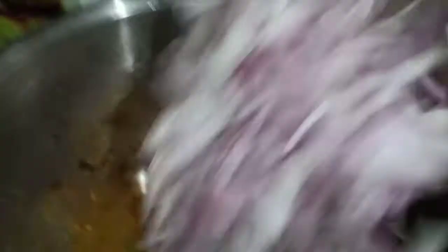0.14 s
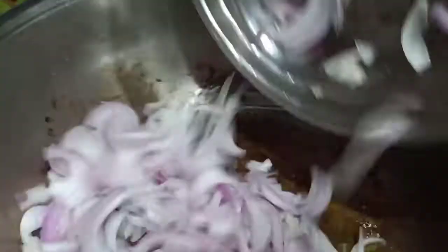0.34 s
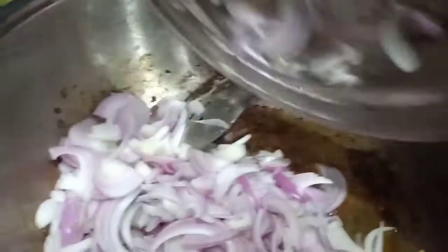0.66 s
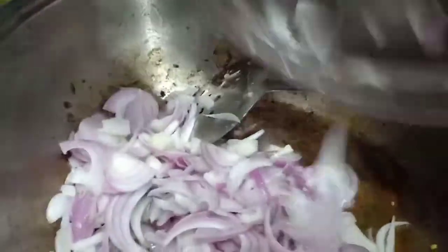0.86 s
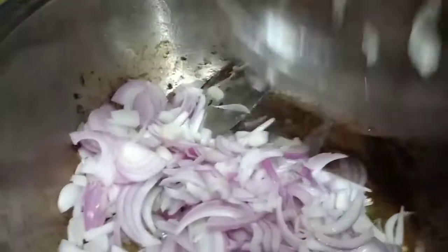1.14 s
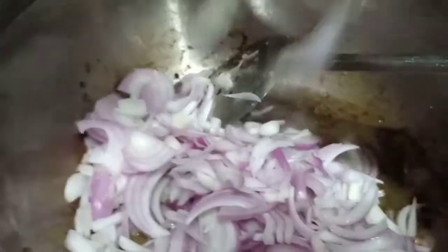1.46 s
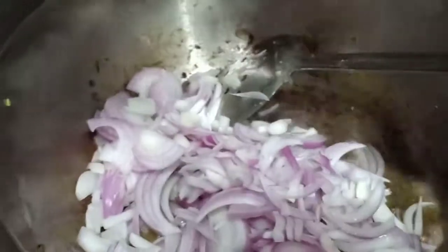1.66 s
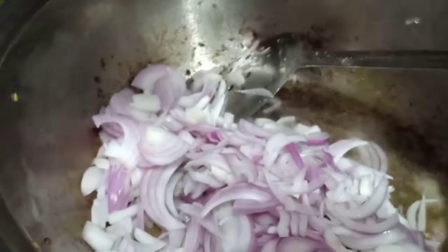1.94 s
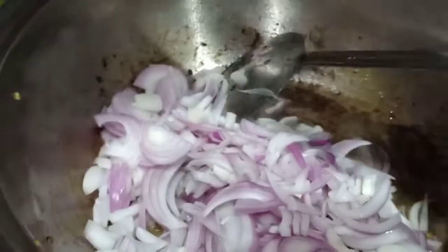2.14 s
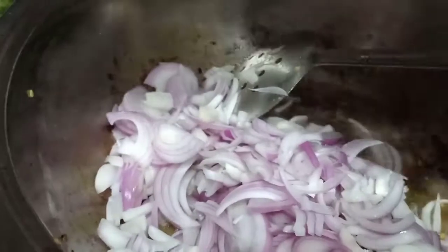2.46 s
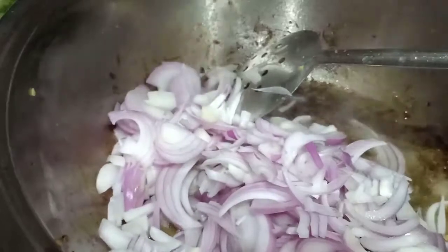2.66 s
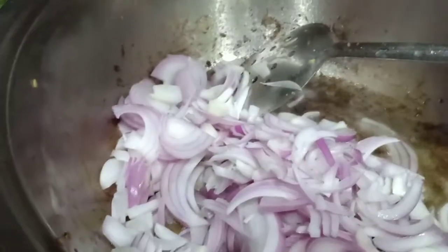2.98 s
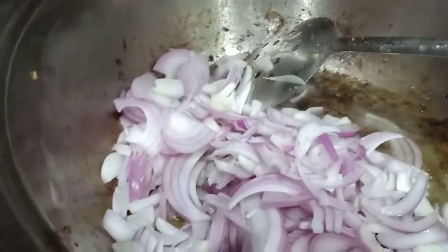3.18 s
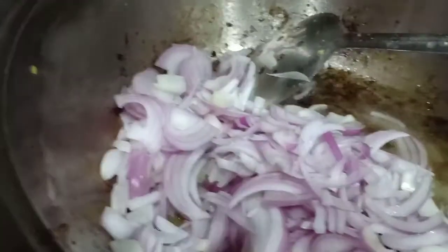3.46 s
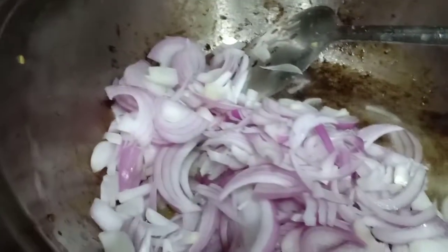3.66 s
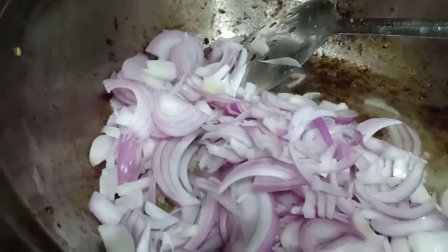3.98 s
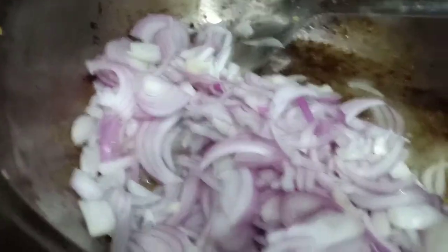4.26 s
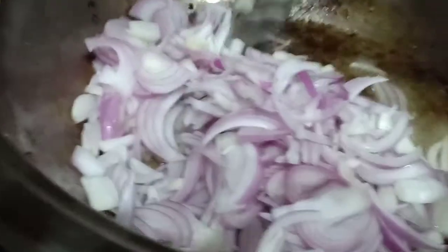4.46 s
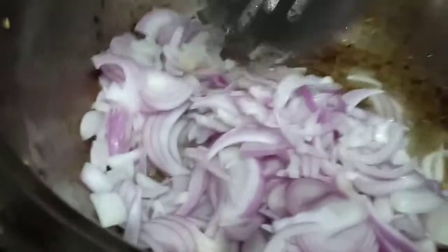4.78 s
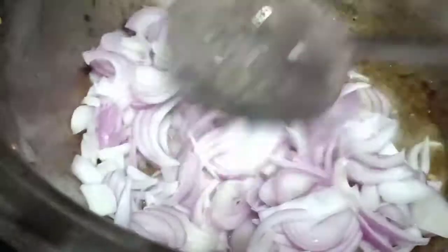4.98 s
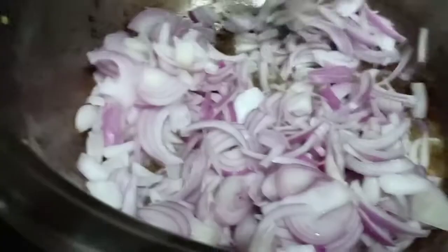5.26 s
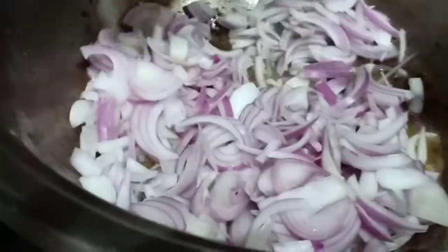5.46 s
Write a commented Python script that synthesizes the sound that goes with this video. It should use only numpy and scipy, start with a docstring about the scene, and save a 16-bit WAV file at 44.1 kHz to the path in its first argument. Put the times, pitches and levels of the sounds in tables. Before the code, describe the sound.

A brief metallic scrape and clank, a thud of onions landing, then a rushing, crackling fry with one ladle clank midway.

```python
"""In a kitchen, over a wide pan of hot oil: a phone held close, with two microphone ports, as sliced onions slide in.
A steel bowl rubs, sings and clanks as damped modes; the slices thud and patter on the pan, and steam rushes out.
Water boils off in bubbles of four sizes, each a band of noise puffs over smooth hiss, flaring with ladle stirs.
Single spits and plops are short damped rings; a ladle clanks and scrapes. Underneath are dull bumps, quiet room
noise and faint low noise in narrow bands, broken up at random by flicker and gaps."""
import sys
import numpy as np
from scipy import signal
from scipy.fft import rfft, irfft, next_fast_len
from scipy.io import wavfile
from scipy.ndimage import uniform_filter1d

SR = 44100
rng = np.random.default_rng(int(sys.argv[2]) if len(sys.argv) > 2 else 0)


def master(y):
    """Save y as 16-bit WAV."""
    cut = np.clip(np.atleast_2d(y).T, -1, 1)
    pcm = np.round(cut * 32767)  # scale
    wavfile.write(sys.argv[1], SR, pcm.astype(np.int16))


N = 248046

# Quiet sounds under the frying.
# Colour of the room noise. Each row: frequency in Hz, level in dB per Hz.
KITCHEN_COLOUR = [(59, -31), (100, -25), (367, -1), (502, -34), (2090, 4), (2420, -25), (3390, -0.5),
                  (15000, -37)]
KITCHEN_DB = -50
# Top level of a faint low hum, broken up by flicker and gaps. Each row: time in seconds, level in dB.
HUM_TOP = [(0, -54), (1.85, -55), (1.95, -66), (2.3, -58), (2.8, -72), (3.3, -57), (3.6, -54), (5.2, -53),
           (5.35, -70), (5.6, -85)]
HUM_HZ, HUM_HALF_WIDTH_HZ = 102, 14
HUM_FLICKER_DB, HUM_FLICKER_RATE = 16, 26  # dB either side of the middle, new levels per s
# Narrow low noise switched on and off at random. Each row: frequency in Hz, level re the hum's top in dB.
GAPPED_BANDS = [(225, -9), (320, -4.5)]
GAP_DB, GAP_RATE = 40, 20  # depth of the gaps, new levels per s
# Dull bumps against the pan. Each row: centre in seconds, level in dB, time to fall to 1/e in ms.
BUMPS = [(3.470, -40, 25), (3.66, -48, 60), (.3, -57, 150), (5.255, -46, 6), (5.37, -46, 12),
         (5.475, -46, 18)]
BUMP_HZ = 300

# The steel bowl.
# Modes of the bowl wall. Each row: frequency in Hz, gain in dB, decay by 60 dB in seconds.
BOWL = [(2227, 13, 0.016), (2776, 0, 0.048), (2780, -14, .03), (890, 14, 0.018), (580, -28, .04),
        (1470, -7, 0.066), (5130, 3, 0.009), (3700, -15, 0.009)]
# Slices sliding down the bowl. Each row: time in seconds, level in dB.
SLIDE = [(0, -49), (.036, -58), (.044, -28.5), (.07, -39.5), (.105, -35.5), (.128, -42), (.15, -37.5),
         (.19, -37.5), (.205, -37.5), (.3, -45)]
SLIDE_OTHER_DB = -6  # modes after the first three, re those three
# Slices skidding on the wall. Each row: start in seconds, length in ms, level of the lower ring in dB,
# upper ring re the lower in dB.
SKIDS = [(.066, 10, -35, -8), (.077, 24, -39, 4), (.1035, 22, -23, -14), (.133, 12, -27, -6),
         (.142, 12, -34, 4), (.151, 20, -24, -7), (.172, 20, -33, 5)]
# Two bands of rough rustle under each skid. Each row: low edge in Hz, high edge in Hz.
RUSTLE_BANDS = ((2000, 3100), (4700, 6000))
RUSTLE_DB, RUSTLE_TOP_DB = -9, -4  # re the skid's ring, upper band re lower band
# Knocks on the bowl. Each row: start in seconds, peak in dB, left minus right in dB.
KNOCKS = [(.0302, -30, -8), (0.0403, -11, -8.5)]

# The boil.
# How hard the pan boils. Each row: time in seconds, fizz level in dB, lean toward bigger bubbles in dB.
BOIL = [(.09, -56, -6), (.16, -44.5, -8), (.207, -47, -6), (.213, -39, 8), (.232, -35, 11), (.243, -31, 7),
        (.27, -28.5, 3), (.33, -23.5, 0), (.49, -21, -1.5), (.53, -27, 4.5), (.7, -21, 1), (.85, -24, 3),
        (1.25, -24.5, 2), (1.7, -22, 1.5), (1.8, -25.5, 0.5), (1.95, -25, 0), (2.3, -24.5, 0.5),
        (2.9, -21, 1.5), (3.5, -21.5, 1.5), (3.85, -24.5, 1), (4.5, -25, 0), (4.8, -23.5, -0.5),
        (5.12, -25, 0.5), (5.45, -22.5, -2), (5.62, -24.5, -1.5)]
# Colour of a bursting bubble through pan and microphone. Each row: frequency in Hz, level in dB per Hz.
SIZZLE = [(190, -59), (330, -42), (401, -33.5), (464, -26), (503, -15.5), (582, -20.5), (1350, -13),
          (1960, -2.5), (2660, 0.5), (3450, -10), (5010, 2), (7630, -14), (9720, -20.5), (13900, -15),
          (15800, -21.5)]
# Bubble sizes. Each row: low edge in Hz, high edge in Hz, bursts per s, size scatter in dB, burst length in ms,
# share of smooth hiss, flicker in dB.
BUBBLES = [(3460, 6590, 900, 9, 2.3, 0.77, .5), (1280, 3700, 460, 2.5, 3.7, 0.57, 0.5),
           (377, 1088, 600, 2.5, 1.6, 0.54, 1.5), (7010, 19800, 3800, 7, 2.2, 0.81, 0.85)]
# One entry per bubble size: level re the fizz in dB.
SIZE_DB = (0, -5.5, -20, -8)
# One entry per bubble size: how far it follows the lean, as a factor.
SIZE_LEAN = (0, 1, 1, 0.00076)
# One entry per bubble size: likeness of left and right, 0 to 1.
ALIKE = (.2, .2, .62, .05)
# One entry per bubble size: power of the shared snaps, re the size's own power.
SNAP_SHARE = (0.085, 0.14, 0.1, 0.011)
SNAP_RATE, SNAP_SCATTER_DB, SNAP_MS = 55, 0, 0.75  # snaps per s that sound in every size at once
SURGE_DB, SURGE_RATE = .6, 18  # the whole pan surges together, new levels per s
# The ladle turns wet slices into the oil and the boil flares. Each row: start in seconds, hold in seconds,
# rise in dB.
STIRS = [(5.131, 0.071, 5), (5.276, 0.01, 1.5), (5.44, 0.043, 1.5)]
STIR_ATTACK_S, STIR_T60_S = 0.032, 0.08  # the t60 is that of the dB rise itself
# Difference between the two ports. Each row: frequency in Hz, left minus right in dB.
PORTS = [(60, 1.0), (110, 3), (200, -7), (380, -6), (700, -3), (1290, -5.5), (2380, -7.5), (4400, -4),
         (8120, -2.5), (15000, 1.5)]
# The phone drifts over the pan. Each row: time in seconds, left minus right of the fizz in dB (used re its mean),
# left minus right of the spits in dB, left lag in samples.
DRIFT = [(0.3, -4.5, -8, 2), (1.3, -5, -8.5, 2), (1.7, -4, -5.5, 2), (2.2, -3, -4.5, -6),
         (2.6, -2.5, -3.5, -7), (3.7, -2.5, -3.5, -7), (4.3, -3, -5, -6), (4.9, -3.5, -6, -5),
         (5.15, -4.5, -8, 1), (5.6, -4.5, -8, 1)]

# The slices on the pan.
# Modes of the pan. Each row: frequency in Hz, gain in dB, decay by 60 dB in seconds.
PAN = [(392, -20, 0.25), (520, -16, 0.2), (692, -11, 0.35), (785, -7, 0.13), (815, -4, 0.13),
       (975, -9, .07), (1440, -3, 0.05), (1680, -3, .04), (2300, 13, 0.012), (4030, -2, .015),
       (4900, 9, 0.014), (5780, 5, .015)]
# Thuds on the pan. Each row: start in seconds, peak in dB, left minus right in dB.
THUDS = [(.2118, -22, -6), (0.2358, -6, -6.5), (.2383, -8, -6.5), (.2478, -21, -6.5), (.2595, -17, -6.5),
         (.2668, -22, -6.5)]
# slices keep landing and ring the pan
PATTER_S, PATTER_DB, PATTER_ATTACK_S, PATTER_T60_S = 0.203, -32, 0.025, 0.75
# the first rush of steam has a narrow bright hiss that rises in pitch, then sags
RUSH_S, RUSH_DB, RUSH_ATTACK_S, RUSH_HOLD_S, RUSH_T60_S = .285, -29.5, 0.03, 0.28, 0.3
RUSH_START_HZ, RUSH_TOP_HZ, RUSH_RISE_S, RUSH_SAG_HZ_PER_S = 2350, 2600, .06, 600
RUSH_WIDTH_HZ = 450

# Single bubbles.
# Spits. Each row: time in seconds, peak in dB, ring in Hz, thump re peak in dB.
SPITS = [(0.3504, -14, 4880, -16), (0.4514, -15, 2470, -25), (0.4694, -11, 2460, -28),
         (0.482, -18, 2320, -29), (0.4884, -14, 2500, -30), (0.5152, -10.5, 2820, -39),
         (0.6439, -12, 2600, -31), (0.653, -11, 2680, -29), (0.6634, -16, 5200, -25),
         (0.7118, -12, 5330, -27), (0.7318, -9.5, 1980, -20), (0.7474, -7.5, 5340, -25),
         (0.7654, -13, 2160, -16), (0.777, -8, 5270, -24), (0.91, -9, 5370, -23), (1.3029, -15, 5450, -12),
         (1.5848, -12.5, 2670, -17), (1.7095, -12.5, 2580, -31), (2.117, -12, 5180, -32),
         (2.6194, -14, 4760, -28), (2.7074, -23, 5280, -22), (2.7944, -29, 5340, -28),
         (2.8416, -8, 5200, -39), (2.8684, -19, 4910, -29), (2.9064, -18, 4750, -9),
         (2.9374, -17, 4740, -9), (2.9655, -5.5, 5100, -17), (2.9854, -14, 4840, -16),
         (3.0204, -11, 5330, -18), (3.1852, -21, 5000, -31), (3.6172, -20, 4600, -26),
         (3.6618, -9, 4900, -30), (3.7379, -20, 4900, -27), (3.8154, -16, 2700, -22),
         (3.8364, -19, 5170, -21), (3.8654, -8, 2500, -25), (3.936, -11, 4300, -32),
         (4.1054, -20, 5270, -24), (4.2876, -6.5, 5000, -27), (4.3395, -11, 5190, -36),
         (4.4094, -19, 2280, -31), (4.9194, -18, 5120, -24), (5.1978, -13, 5270, -30),
         (5.217, -12, 5140, -30), (5.2246, -11, 5070, -35), (5.2304, -19, 4570, -25),
         (5.2364, -10, 4900, -28), (5.255, -5, 5070, -33), (5.2657, -12, 5000, -23),
         (5.2889, -16, 4170, -18), (5.2918, -9, 5000, -32), (5.3004, -15, 5100, -13.5),
         (5.3644, -8.5, 5140, -20), (5.38, -11, 4850, -16.5), (5.4364, -20, 5200, -12),
         (5.457, -13, 5360, -22), (5.4684, -14, 5350, -17), (5.4823, -7.5, 4970, -22),
         (5.5047, -16, 5050, -22), (5.5483, -11, 5130, -32), (0.589, -18, 1580, -27),
         (1.495, -24, 920, -20), (3.11, -24.5, 1040, -20), (3.6618, -7, 2340, -27)]
SPIT_DELAY_S = .0006  # each spit starts this long after its listed time
THUMP_HZ = 895  # low thump under each spit
CRACK_RATIO, CRACK_DB = 2.1, -27  # each spit also cracks in the other broad resonance of the sizzle
# quieter plops at random: per s, middle pitch, log spread of pitch, middle peak and its scatter
PLOP_RATE, PLOP_HZ, PLOP_SPREAD, PLOP_DB, PLOP_SCATTER_DB = 3, 1100, .25, -30, 2.5
LOW_PAN_DB = -6  # left minus right of plops and thumps
# decay and rise at 1 kHz; both shorten as powers of the pitch
RING_MS, RISE_MS, RING_SLOPE, RISE_SLOPE = 1.2, .5, .5, .9

# The ladle.
# Modes of the ladle. Each row: frequency in Hz, gain in dB, decay by 60 dB in seconds.
LADLE = [(1975, 0, .05), (1350, -17, .06), (1600, -12, .08), (1870, -10, .09), (2250, -10, .07),
         (2580, -4, .08), (3580, -11, .04)]
# Clanks of the ladle. Each row: start in seconds, peak in dB, left minus right in dB.
CLANKS = [(3.5105, -7, -5), (3.51355, -6.5, -5), (3.5232, -12, -5), (3.541, -18, -5), (3.559, -16, -5),
          (3.576, -21, -5)]
# after the first clanks the ladle slips along the pan wall
SCRAPE_S, SCRAPE_DB, SCRAPE_ATTACK_S, SCRAPE_HOLD_S, SCRAPE_T60_S = 3.52, -30.5, 0.0061, .05, .8

# The phone.
NOTCH_HZ, NOTCH_WIDTH_HZ = 9790, 350  # narrow dip of the microphone port
SQUASH = .6  # how hard the peaks are rounded
TOP_HZ = 15600


def undb(db):
    """Gain of a dB value."""
    return 10 ** (np.asarray(db) / 20)


def unit(x):
    """Scale to rms 1."""
    return x / np.sqrt(np.mean(x ** 2))


def shape(x, table):
    """Colour by (Hz, dB) points joined on a log axis."""
    size = next_fast_len(N)
    points_hz, points_db = np.array(table).T
    log_hz = np.log(np.maximum(np.arange(size // 2 + 1) * SR / size, 1))
    gain = undb(np.interp(log_hz, np.log(points_hz), points_db))
    return irfft(rfft(x, size) * gain, size)[..., :N]


def band(x, low_hz, high_hz, order=2):
    """Butterworth band-pass."""
    edges = [low_hz, min(high_hz, .45 * SR)]
    return signal.sosfilt(signal.butter(order, edges, "bandpass", fs=SR, output="sos"), x)


def walk(rate):
    """Random levels held 1 / rate s and slewed, without slow drift; spread 1."""
    hold = int(SR / rate)
    steps = np.repeat(rng.standard_normal(N // hold + 1), hold)[:N]
    slewed = uniform_filter1d(steps, hold)
    return unit(slewed - uniform_filter1d(slewed, 4 * hold))


def curve(table):
    """Columns of a table at every sample."""
    s, *columns = np.transpose(table)
    return [np.interp(np.arange(N) / SR, s, column) for column in columns]


def swell(s, attack_s, hold_s, t60_s):
    """Gain that rises, holds at 1 and dies away."""
    t = np.arange(N) / SR - s
    return np.clip(t / attack_s, 0, 1) * undb(-60 * np.maximum(t - attack_s - hold_s, 0) / t60_s)


def fade(x, ms):
    """One-pole tail."""
    return signal.lfilter([1], [1, -np.exp(-1000 / (ms * SR))], x)


def bursts(rate, scatter_db, ms):
    """Power of random bursts with a few large ones; mean 1."""
    size = np.minimum(rng.exponential(size=N), 4)
    starts = rng.random(N) < rate / SR
    power = fade(starts * undb(2 * scatter_db * size), ms)  # doubled: dB of power
    return power / power.mean()


def ring(push, modes):
    """Damped modes driven by a force."""
    out = 0
    for hz, db, t60 in modes:
        pole = np.exp(2j * np.pi * hz / SR - np.log(1000) / (t60 * SR))
        out = out + undb(db) * signal.lfilter([1], [1, -pole], push).imag
    return out


def sides(x, pan_db):
    """Place between the two ports."""
    return x * undb(np.multiply.outer([.5, -.5], pan_db * np.ones(N)))


def pair(alike, size=N):
    """Two noises with the given likeness."""
    shared, left, right = rng.standard_normal((3, size))
    return np.sqrt(alike) * shared + np.sqrt(1 - alike) * np.array([left, right])


def blow(hit, modes, push_ms, tick, crack_db, rise_ms=1.0):
    """A tick and a short rough push ring the metal under a broad crack; each port hears another mix."""
    s, db, pan_db = hit
    out, size, i = np.zeros((2, N + SR)), SR // 2, int(s * SR)
    ms = np.arange(size) * 1000 / SR
    rough = (1 - np.exp(-ms / rise_ms)) * np.exp(-ms / push_ms) * pair(0.55, size=size)
    push = tick * (ms == 0) + rough
    # cut the low skirt of the ring filters below the lowest mode
    lowest = min(hz for hz, *_ in modes)
    metal = band(ring(push, modes), .97 * lowest, 12000, order=4)
    crack = undb(crack_db) * band(push, lowest, 6500, order=4)
    sound = metal + crack
    out[:, i:i + size] = sound / np.abs(sound).max(axis=1, keepdims=True)
    return sides(out[:, :N] * undb(db), pan_db)


def broken_low_noise():
    """Faint low hum and two bands above it: narrow noise broken up at random by flicker and gaps."""
    top_db = curve(HUM_TOP)[0]
    flicker_db = HUM_FLICKER_DB * (np.tanh(2 * walk(HUM_FLICKER_RATE)) - 1)
    hum = unit(band(pair(0.57), HUM_HZ - HUM_HALF_WIDTH_HZ, HUM_HZ + HUM_HALF_WIDTH_HZ))
    out = hum * undb(top_db + flicker_db)
    for hz, db in GAPPED_BANDS:
        gap_db = GAP_DB * (np.tanh(2 * walk(GAP_RATE) - 1) - 1) / 2
        noise = unit(band(pair(.6), hz / 1.12, hz * 1.12, order=3))
        out = out + noise * undb(top_db + db + gap_db)
    return out


def kitchen():
    """Quiet room noise, and bumps against the pan as swells of low noise."""
    t = np.arange(N) / SR
    shake = sum(undb(db) * np.exp(-((t - s) * 1000 / ms) ** 2) for s, db, ms in BUMPS)
    bumps = unit(band(pair(0.97), BUMP_HZ / 3, BUMP_HZ * 1.4)) * shake
    room = unit(band(shape(pair(0.13), KITCHEN_COLOUR), 433, 16000, order=8)) * undb(KITCHEN_DB)
    return bumps + room


def skids():
    """Each skid makes two modes of the bowl wall sing briefly, stuttering, over a rough rustle."""
    t, sing, rustle = np.arange(N) / SR, 0, 0
    low_stutter, upper_stutter = undb(2.0 * walk(250)), undb(2.6 * walk(400))
    for s, ms, db, upper_db in SKIDS:
        part = np.clip((t - s) * 1000 / ms, 0, 1)
        detune = 1 + 0.013 * rng.standard_normal(2)
        low = np.sin(2 * np.pi * BOWL[0][0] * detune[0] * (t - s)) * low_stutter
        upper = np.sin(2 * np.pi * BOWL[1][0] * detune[1] * (t - s)) * upper_stutter
        sing = sing + undb(db) * np.sin(np.pi * part ** 0.9) ** 2.1 * (low + undb(upper_db) * upper)
        rustle = rustle + undb(db + max(upper_db, -8) + RUSTLE_DB) * np.sin(np.pi * part) ** 2
    low_band = unit(band(pair(.4), *RUSTLE_BANDS[0]))
    top_band = unit(band(pair(.3), *RUSTLE_BANDS[1]))
    return sing + rustle * (low_band + undb(RUSTLE_TOP_DB) * top_band)


def bowl():
    """Knocks ring the bowl's modes; slices rub them with noise and skid as they slide out."""
    t = np.arange(N) / SR
    moving = np.clip((SLIDE[-1][0] - t) / 0.064, 0, 1) * undb(1.7 * walk(89.4))
    rub = unit(ring(pair(0.2), BOWL[:3])) + undb(SLIDE_OTHER_DB) * unit(ring(pair(0.65), BOWL[3:]))
    slide = rub * undb(curve(SLIDE)[0]) * moving
    knocks = sum(blow(hit, BOWL, 1.5, 4.8, 4.3) for hit in KNOCKS)
    return sides(slide, -3.1) + sides(skids(), -5) + knocks


def frying():
    """Each size of bubble bursts at random as short puffs of noise over a hiss of finer ones."""
    fizz_db, lean_db = curve(BOIL)
    for s, hold, rise_db in STIRS:
        fizz_db = fizz_db + rise_db * swell(s, STIR_ATTACK_S, hold, STIR_T60_S)
    surge_db, out = SURGE_DB * walk(SURGE_RATE), 0
    snaps = bursts(SNAP_RATE, SNAP_SCATTER_DB, SNAP_MS)
    for size, alike, share, db, lean in zip(BUBBLES, ALIKE, SNAP_SHARE, SIZE_DB, SIZE_LEAN):
        low, high, rate, scatter_db, ms, hiss, flicker_db = size
        power = hiss + (1 - hiss) * bursts(rate, scatter_db, ms) + share * snaps
        puffs = pair(alike) * np.sqrt(power)
        level_db = fizz_db + db + lean * lean_db + surge_db + flicker_db * walk(32)
        out = out + unit(band(shape(puffs, SIZZLE), low, high, order=4)) * undb(level_db)
    # each port faces the pan differently, so left and right differ in colour
    ports = np.array(PORTS)
    out = np.array([shape(out[0], ports * [1, .5]), shape(out[1], ports * [1, -.5])])
    onset = np.clip((np.arange(N) / SR - BOIL[0][0]) / 0.0021, 0, 1)
    pan_db = curve(DRIFT)[0]
    return sides(out * onset, pan_db - pan_db.mean())


def steam_rush():
    """Slow noise on a gliding carrier is a narrow band of hiss that moves."""
    t = np.arange(N) / SR - RUSH_S
    rise_hz = np.interp(t, [0, RUSH_RISE_S], [RUSH_START_HZ, RUSH_TOP_HZ])
    hz = rise_hz - RUSH_SAG_HZ_PER_S * np.clip(t - RUSH_RISE_S, 0, 1)
    lowpass = signal.butter(2, RUSH_WIDTH_HZ / 2, fs=SR, output="sos")
    slow = signal.sosfilt(lowpass, pair(0.25) + 1j * pair(0.17))
    hiss = unit((slow * np.exp(2j * np.pi * np.cumsum(hz) / SR)).real)
    return hiss * undb(RUSH_DB) * swell(RUSH_S, RUSH_ATTACK_S, RUSH_HOLD_S, RUSH_T60_S)


def landing():
    """The heap hits the pan, stragglers patter after it on three of its modes and steam rushes out."""
    patter = unit(ring(pair(0.49) * np.sqrt(bursts(150, 3.9, 5.3)), PAN[:3]))
    patter = patter * undb(PATTER_DB) * swell(PATTER_S, PATTER_ATTACK_S, 0, PATTER_T60_S)
    thuds = sum(blow(hit, PAN, 1.3, 6, 17, rise_ms=.2) for hit in THUDS)
    return thuds + sides(patter, -2.5) + sides(steam_rush(), -13)


def add_bubble(out, s, hz, db, pan_db):
    """One bursting bubble: a damped ring, quicker the smaller it is."""
    rise_ms, ring_ms = RISE_MS * (hz / 1000) ** -RISE_SLOPE, RING_MS * (hz / 1000) ** -RING_SLOPE
    ms = np.arange(1024) * 1000 / SR
    burst = np.sin(2 * np.pi * hz * ms / 1000) * (1 - np.exp(-ms / rise_ms)) * np.exp(-ms / ring_ms)
    burst = burst / np.abs(burst).max() * undb(db)
    i = int(s * SR)
    out[0, i:i + 1024] += burst * undb(pan_db / 2)
    out[1, i:i + 1024] += burst * undb(-pan_db / 2)


def spits():
    """Drops of water flashing to steam crack with a small thump; big bubbles plop."""
    out = np.zeros((2, N + 2048))
    span_s = N / SR - RUSH_S  # no plops before the rush of steam
    for _ in range(int(PLOP_RATE * span_s)):
        s = RUSH_S + rng.random() * span_s
        db = PLOP_DB + PLOP_SCATTER_DB * rng.standard_normal()
        hz = PLOP_HZ * np.exp(PLOP_SPREAD * rng.standard_normal())
        add_bubble(out, s, hz, db, LOW_PAN_DB)
    pan_db = curve(DRIFT)[1]
    for s, db, hz, thump_db in SPITS:
        pan, s = pan_db[int(s * SR)], s + SPIT_DELAY_S
        crack_hz = hz / CRACK_RATIO if hz > BUBBLES[0][0] else hz * CRACK_RATIO
        add_bubble(out, s, hz, db, pan)
        add_bubble(out, s, crack_hz, db + CRACK_DB, pan)
        add_bubble(out, s, THUMP_HZ, db + thump_db, LOW_PAN_DB)
    return band(out[:, :N], 420, 16000, order=4)


def ladle():
    """Clanks ring the ladle's modes; dense stick-slip clicks keep them ringing as it settles."""
    clanks = sum(blow(hit, LADLE, 3., 30, 2) for hit in CLANKS)
    drag = unit(ring(pair(.6) * np.sqrt(bursts(200, 4, 1.5)), LADLE))
    scrape = drag * undb(SCRAPE_DB) * swell(SCRAPE_S, SCRAPE_ATTACK_S, SCRAPE_HOLD_S, SCRAPE_T60_S)
    return clanks + sides(scrape, CLANKS[0][2])


def scene():
    """All layers summed; the left port hears them a little before or after the right."""
    out = broken_low_noise() + kitchen() + bowl() + frying() + landing() + spits() + ladle()
    lag = np.round(curve(DRIFT)[2]).astype(int)
    late = np.clip(np.arange(N) - lag, 0, N - 1)
    return np.array([out[0, late], out[1]])


def record(dry):
    """The port has a narrow dip and a bass cut; the phone rounds the loudest peaks and cuts the top."""
    dip = signal.lfilter(*signal.iirpeak(NOTCH_HZ, NOTCH_HZ / NOTCH_WIDTH_HZ, fs=SR), dry)
    port = signal.sosfilt(signal.butter(2, 70, "highpass", fs=SR, output="sos"), dry - dip)
    rounded = np.tanh(SQUASH * port) / SQUASH
    return signal.sosfilt(signal.ellip(10, .2, 80, TOP_HZ, fs=SR, output="sos"), rounded)


dry = scene()
out = record(dry)
master(out)
```